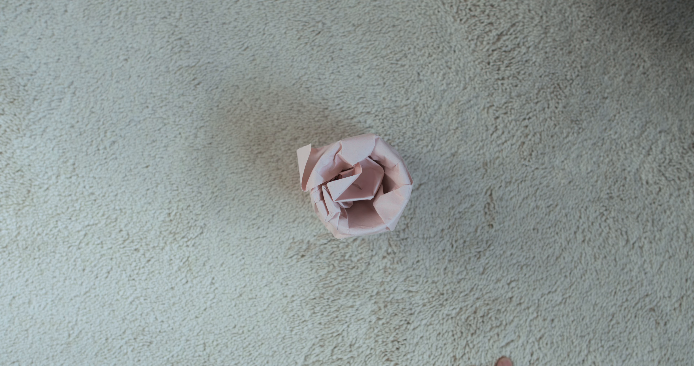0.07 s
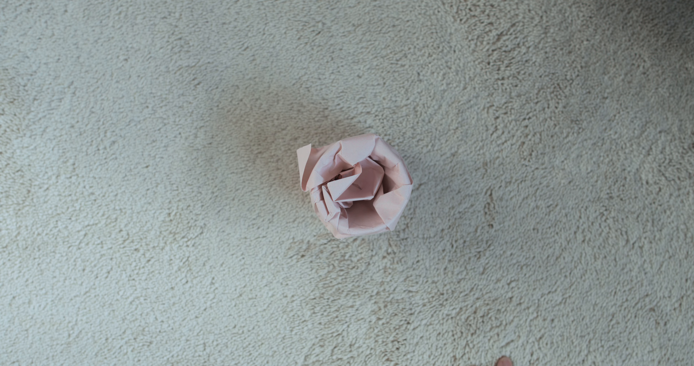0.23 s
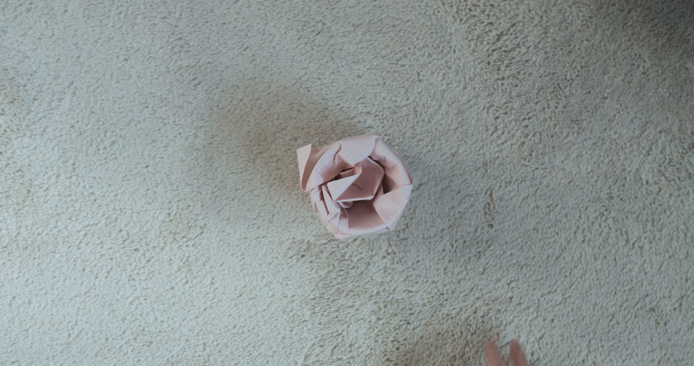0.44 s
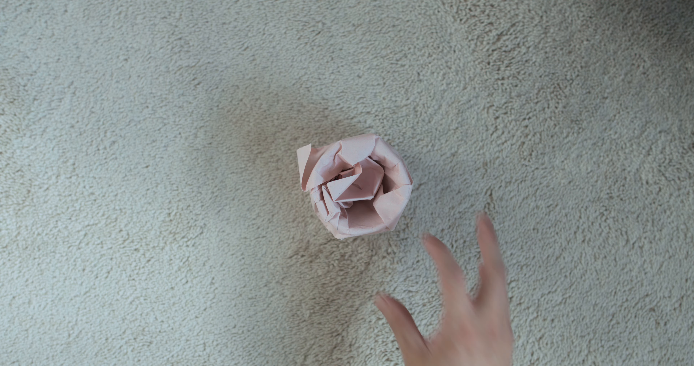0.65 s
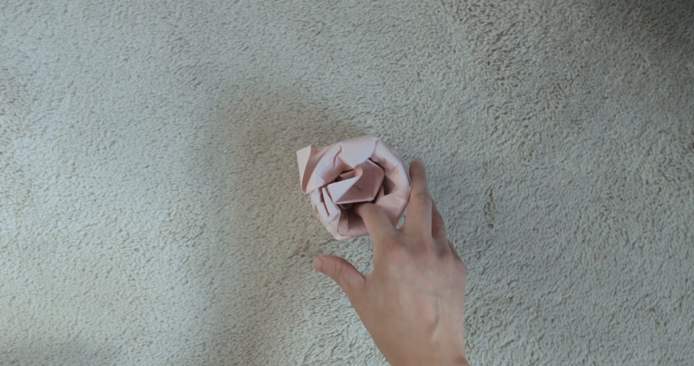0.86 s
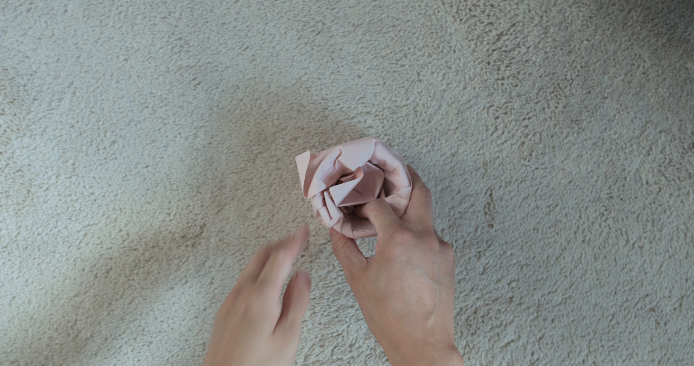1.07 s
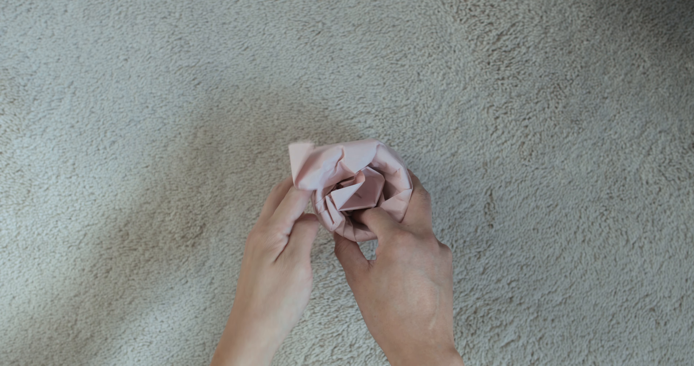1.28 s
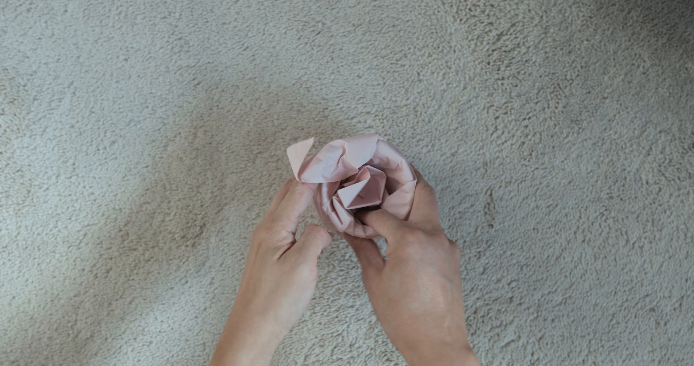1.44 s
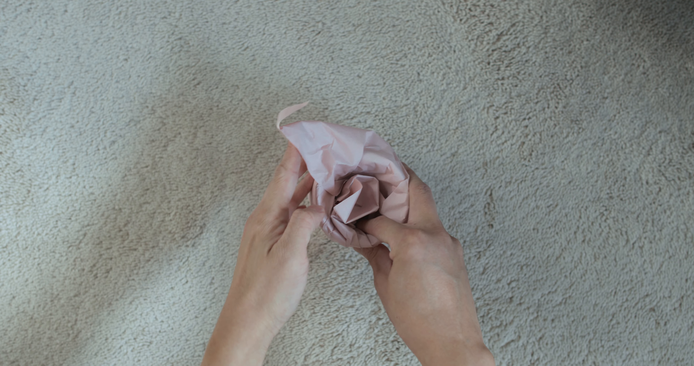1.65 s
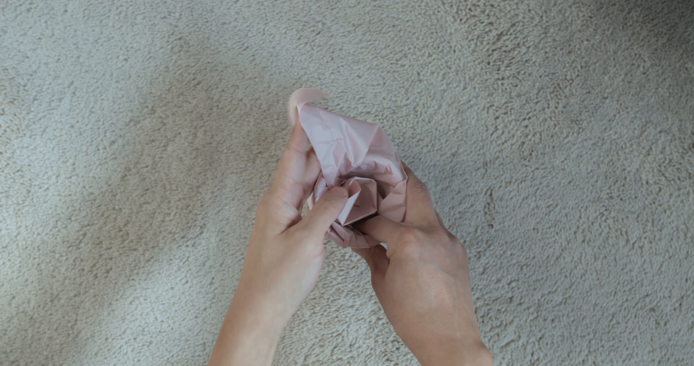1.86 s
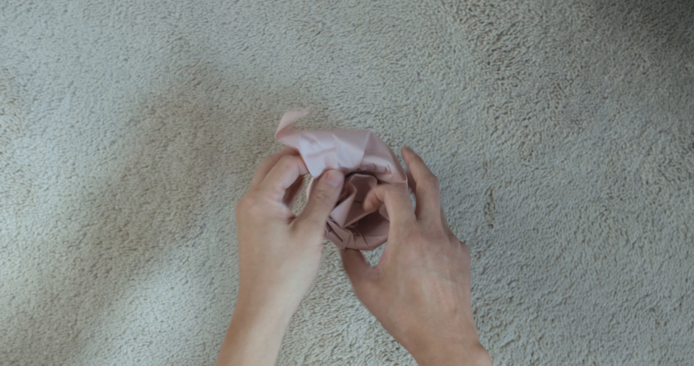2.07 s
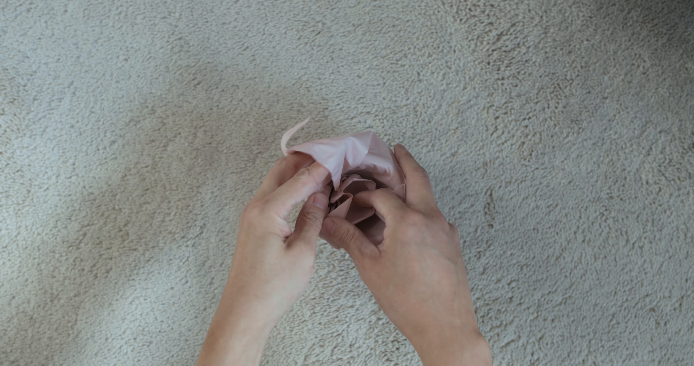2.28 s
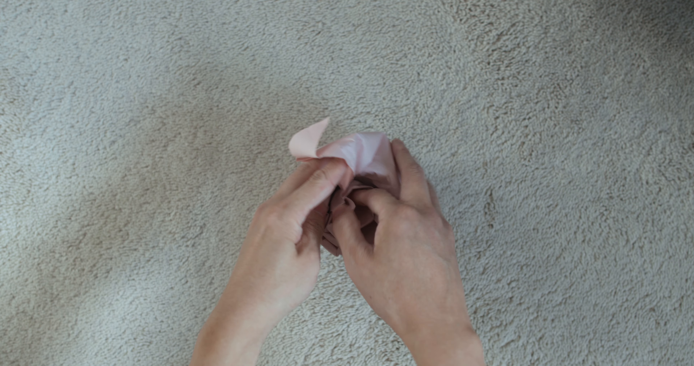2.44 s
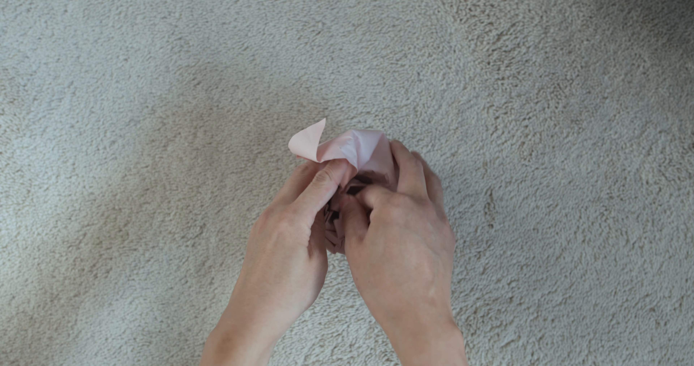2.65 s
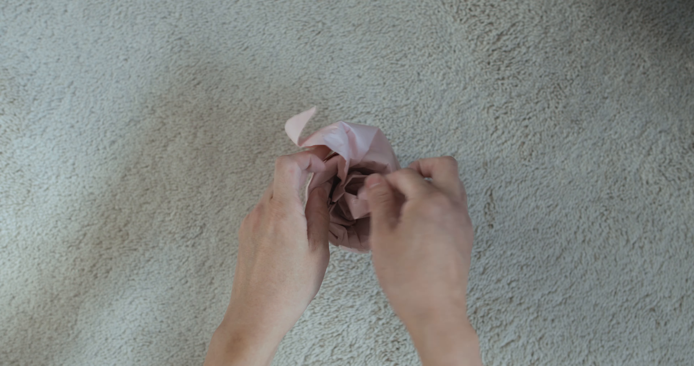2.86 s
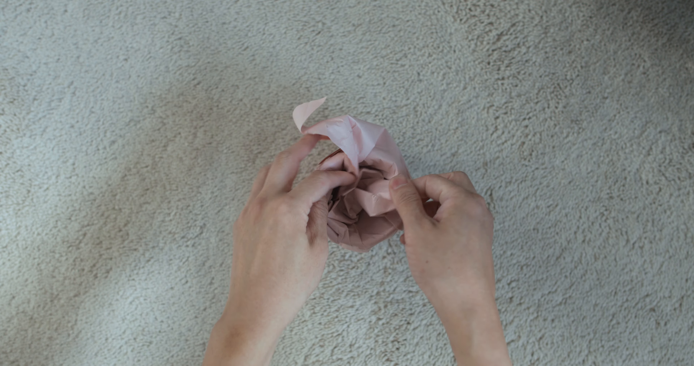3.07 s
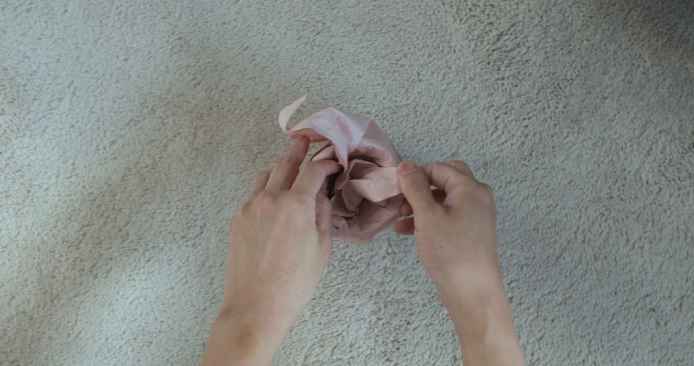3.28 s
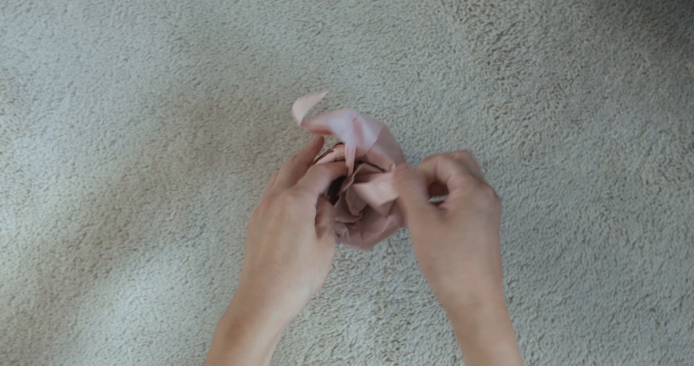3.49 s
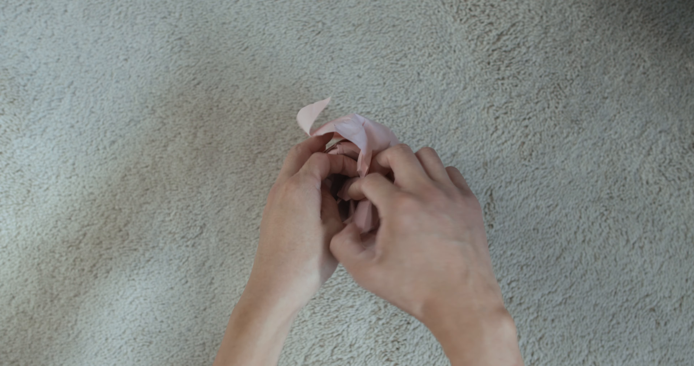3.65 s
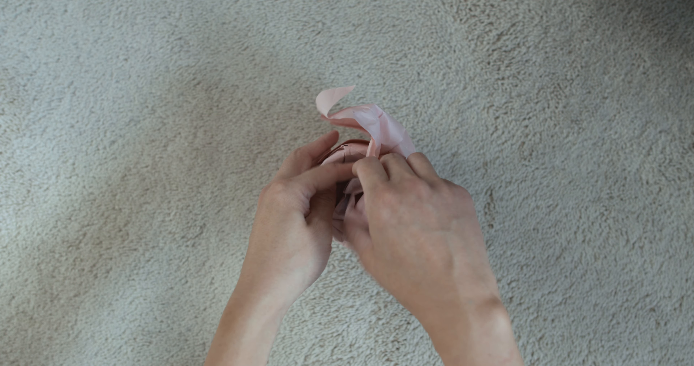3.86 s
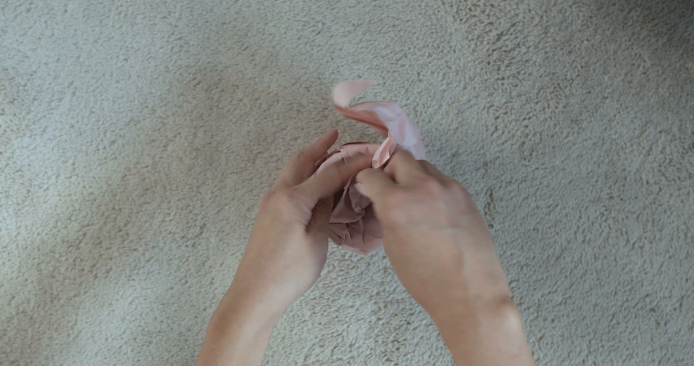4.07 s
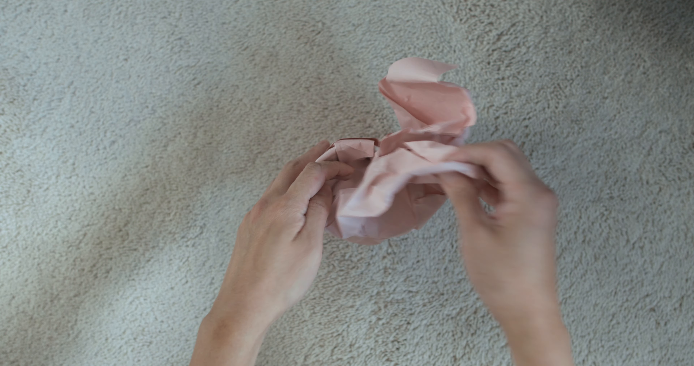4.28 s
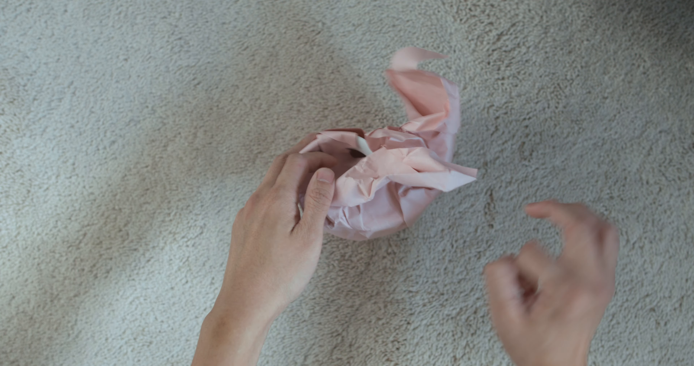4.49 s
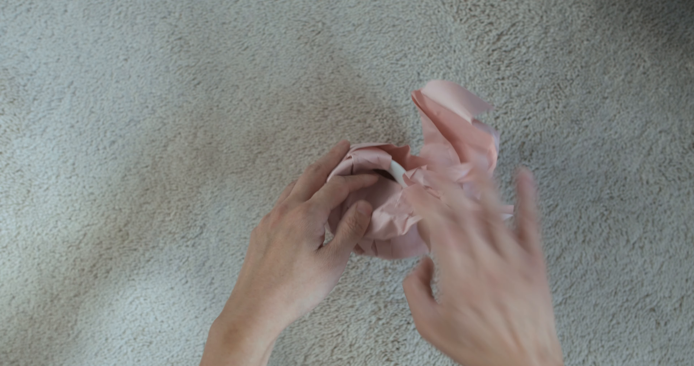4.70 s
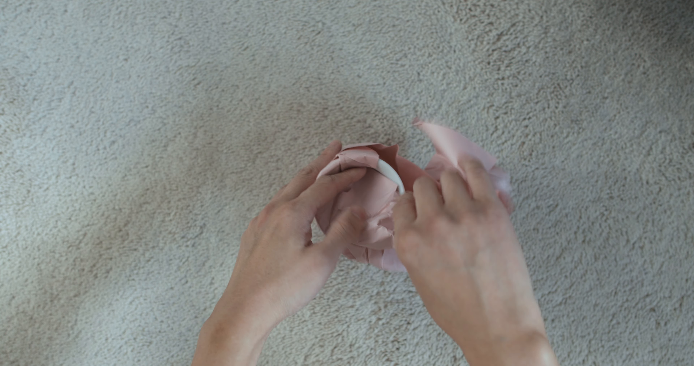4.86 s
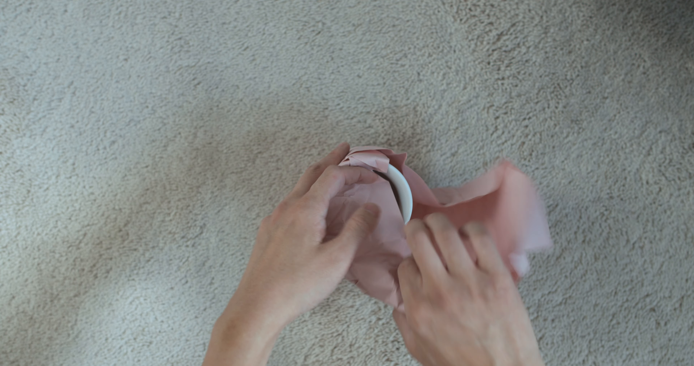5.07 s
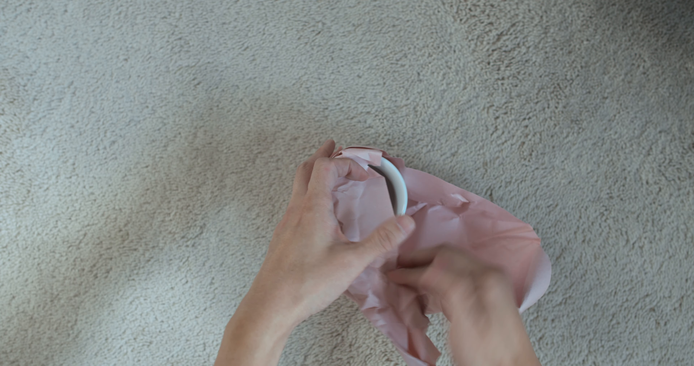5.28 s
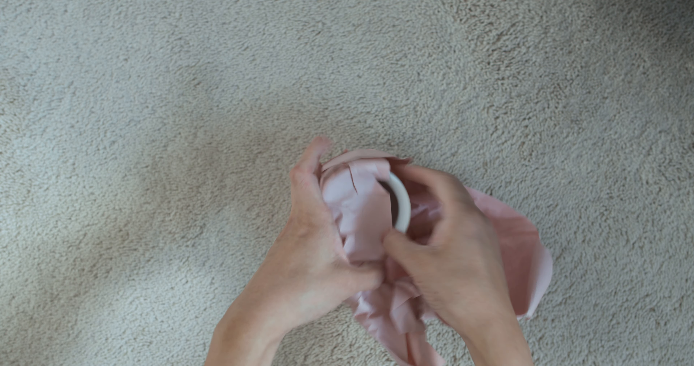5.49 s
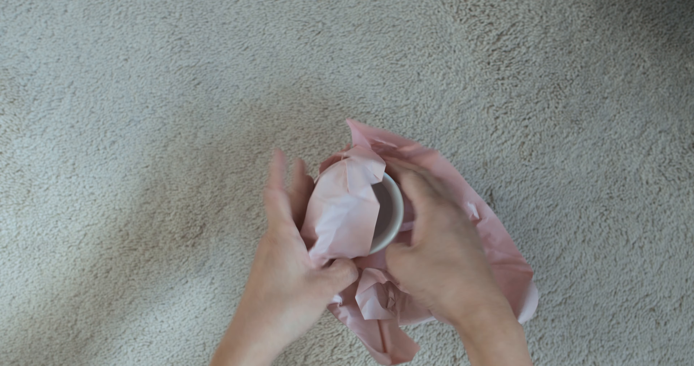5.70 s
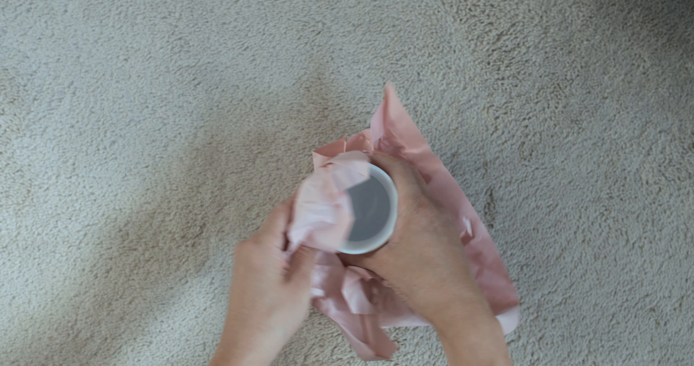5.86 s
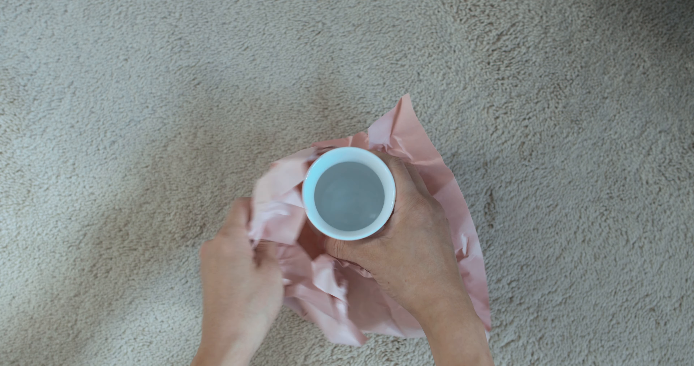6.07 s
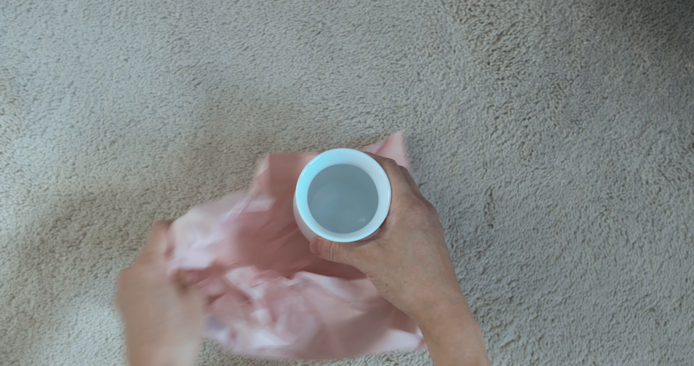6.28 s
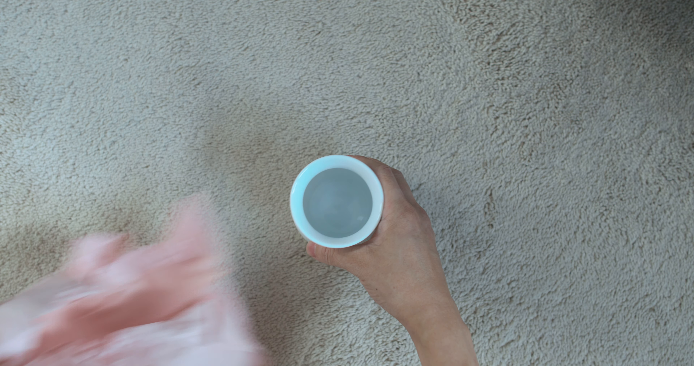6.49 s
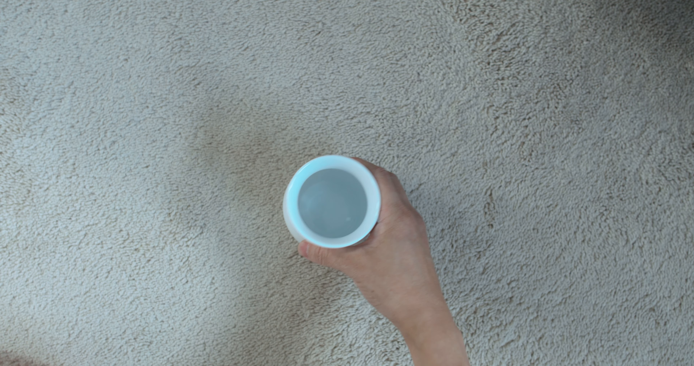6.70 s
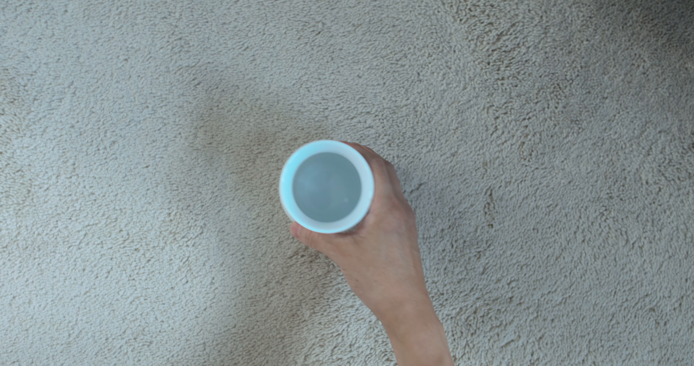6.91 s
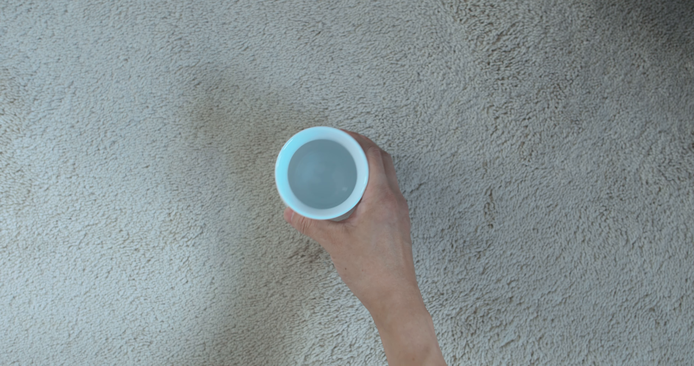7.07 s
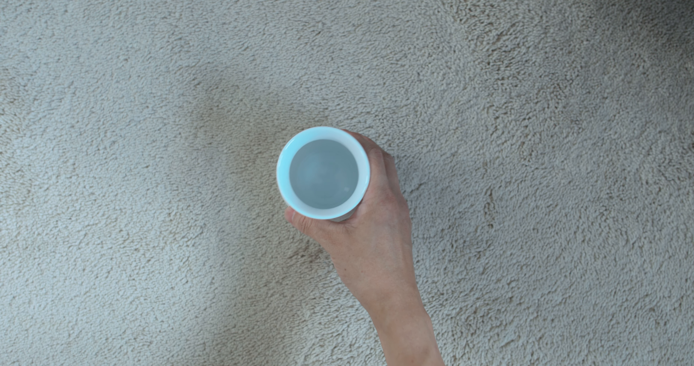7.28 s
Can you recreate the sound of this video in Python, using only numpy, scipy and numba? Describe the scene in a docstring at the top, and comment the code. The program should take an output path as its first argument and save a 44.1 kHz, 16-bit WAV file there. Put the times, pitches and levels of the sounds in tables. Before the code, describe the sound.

Hands unwrap a ceramic cup from thin paper, with crisp close crackles, sharp crease snaps and sliding rustle, fading into a quiet room.

```python
"""Hands unwrap a ceramic cup from thin tissue paper on a carpet.
A sleeve brushes over a quiet room's hum, then the paper is touched: creases buckle in short snaps
(noise bursts into damped modes) over dense crackle (small random snaps) and sliding hiss (noise bands).
The cup's air, a swept band-pass, rings along and a short echo follows; the loudest snaps clip.
At the end the sheet is pulled away and its rustle dulls and fades."""
import sys
import numpy as np
from scipy import signal
from scipy.fft import rfft, irfft
from scipy.io import wavfile
from scipy.ndimage import uniform_filter1d
from numba import njit

SR = 44100
rng = np.random.default_rng(int(sys.argv[2]) if len(sys.argv) > 2 else 0)


def store_wav(level_fs):
    """Save 16-bit WAV to argv[1]."""
    pcm = np.round(np.clip(np.atleast_2d(level_fs), -1, 1) * 32767)
    wavfile.write(sys.argv[1], SR, pcm.T.astype(np.int16))


N = 323694

# Air in the cup, deeper while paper plugs its mouth.
# Each row: time in seconds, pitch in Hz, ring level in dB re the paper.
CUP_AIR = [(.9, 540, -22), (1.9, 610, 2.5), (2.4, 600, -17), (2.6, 346, -28), (2.8, 320, 2),
           (3.0, 437, -24), (3.95, 435, -8), (4.15, 518, -1.5), (5.3, 577, -1.5), (5.75, 610, 7.5),
           (6.3, 610, -8)]


def undb(db):
    """Amplitude ratio of a level in dB."""
    return 10 ** (np.asarray(db) / 20)


def level(x, db):
    """Scale to an RMS level in dB."""
    return x * undb(db) / np.sqrt(np.mean(x ** 2))


def shape_db(table, hz):
    """Read a spectrum on a log-frequency axis."""
    table_hz, table_db = np.transpose(table)
    return np.interp(np.log(hz), np.log(table_hz), table_db)


def noise():
    """White noise for the whole scene."""
    return rng.standard_normal(N)


def walk(rate_hz):
    """Random levels held 1 / rate_hz seconds and slewed twice; spread near 1."""
    hold = int(SR / rate_hz)
    steps = np.repeat(rng.standard_normal(N // hold + 1), hold)
    slewed = uniform_filter1d(uniform_filter1d(steps, hold), hold)
    return 3.1 * slewed[:N]


@njit
def svf(x, hz, width_hz):
    """State-variable band-pass, gain 1 at the centre; hz holds one value or one for each sample."""
    y = np.empty(len(x))
    band, low, g, damping = 0., 0., 0., 0.
    for i in range(len(x)):
        if i < len(hz):
            g, damping = np.tan(np.pi * hz[i] / SR), width_hz / hz[i]
        v = (band + g * (x[i] - low)) / (1 + g * (g + damping))
        band, low = 2 * v - band, low + 2 * g * v
        y[i] = damping * v
    return y


@njit
def ring(start_s, hz, width_hz, tau_s, peak, hiss):
    """Each grain: a noise burst that swells and dies shakes a damped panel mode; scaled to its peak."""
    out, grain = np.zeros(len(hiss)), np.zeros(4096)
    for e in range(len(start_s)):
        i0, tau = int(start_s[e] * SR), tau_s[e] * SR
        n = min(4096, int(6 * tau + 2 * SR / width_hz[e]), len(out) - i0)
        g, damping = np.tan(np.pi * hz[e] / SR), width_hz[e] / hz[e]
        band1, low1, band2, low2, top = 0., 0., 0., 0., 1e-12
        for i in range(n):
            u = i / tau
            burst = hiss[i0 + i] * u * np.exp(-u * u / 2)
            # two band-pass stages in series
            v = (band1 + g * (burst - low1)) / (1 + g * (g + damping))
            band1, low1 = 2 * v - band1, low1 + 2 * g * v
            w = (band2 + g * (v - low2)) / (1 + g * (g + damping))
            band2, low2 = 2 * w - band2, low2 + 2 * g * w
            grain[i] = w
            top = max(top, abs(w))
        for i in range(n):
            out[i0 + i] += peak[e] / top * grain[i]
    return out


def snaps():
    """A buckling crease: the panel rings, a quick crack on top, a slower thump of the fold."""
    # Each row: time in seconds, level in dB, panel pitch in Hz, thump and crack in dB re the level;
    # levels are before the trims below.
    creases = [(0.903, -21.5, 1310, -3.5, -21), (0.967, -7.5, 1640, -13, -10), (1.0, -3, 1130, -15, -0.5),
               (1.005, 0.5, 1560, -23, -36), (1.133, -6.5, 2830, -20, -8), (1.145, -2, 2000, -17, -20),
               (1.243, -1, 2020, -23, -18), (1.25, -10.5, 1080, -7.5, -37), (1.26, 5, 1870, -13, -60),
               (1.308, 2, 1760, -29, -24), (1.393, -3, 2430, -32, -38), (1.408, -11, 2540, -22, -26),
               (1.421, 8.5, 5200, -30, -19), (1.622, -1, 5060, -40, -20), (1.634, 1.5, 1100, -6, 0.5),
               (1.832, 1.5, 1750, -16, -14), (1.875, -0.5, 5100, -32, 4), (1.926, -14.5, 8000, -22, 1),
               (1.989, -3, 3150, -12, 4), (2.021, -5, 2000, -14, -22), (2.061, 3.5, 2420, -19.5, -14.5),
               (2.118, -18, 1310, -29, -26), (2.145, 0, 5530, -11.5, -14), (2.151, 2.5, 1950, -35, -3),
               (2.244, 2.5, 3500, -15, -6), (2.31, -7.5, 1760, -16.5, -28), (2.435, -4, 2600, -34, -27),
               (2.444, -0.5, 1890, -21, -18), (2.452, -3.5, 2870, -23, -18), (2.492, 1.5, 1690, -15.5, -12),
               (2.627, -13, 4700, -27, 0), (2.679, -5, 5140, -30, -9), (2.762, -9, 2880, -37, -22),
               (2.787, -9.5, 1920, -17, -8), (2.894, -4, 2800, -40, -32), (2.984, -23.5, 1100, 3, -20),
               (3.033, 2.5, 1630, -20, -4), (3.051, -2, 2380, -19, -19), (3.189, -15, 2310, -25, -10),
               (3.226, 2.5, 1180, -20, -8.5), (3.3, -8, 910, -14, -3), (3.31, -15, 1890, -7, -6),
               (3.358, -17, 1650, -18, -15), (3.459, -4.5, 2120, -37, -15), (3.472, -5, 1490, -42, 1.5),
               (3.568, -0.5, 730, -13.5, -30), (3.714, -9, 2020, -33, -27), (3.729, -7, 2080, -26, -9),
               (3.921, -10.5, 6840, -32, 9), (3.946, -16, 5100, -2, -20), (3.956, -12, 5950, -6, 9),
               (3.982, -4, 1860, -26, 2), (4.039, -4.5, 3300, -37, -6), (4.053, -5, 1800, -37, -21),
               (4.079, -10.5, 1300, -20, -1), (4.11, -2.5, 2510, -18, 3), (4.135, -5, 1380, -20, -11),
               (4.141, -3.5, 1770, -17, -20), (4.166, -10.5, 1860, -33, 12), (4.187, -6.5, 2220, -18, -7),
               (4.202, -8, 3850, -26, -7), (4.212, -8, 1840, -26, -2), (4.244, -5.5, 4620, -10, 0),
               (4.257, -2, 1680, -34, -8), (4.275, 0.5, 4180, -30, -35), (4.297, -13, 1000, -10, 1),
               (4.311, -7.5, 4060, -20, -3), (4.327, -5, 2100, -13, -1), (4.362, -10, 2800, -25, -1),
               (4.385, -13, 3000, -10, 0), (4.418, 0, 4100, -11.5, -11.5), (4.443, -7, 6160, -35, -30),
               (4.458, -5, 4720, -9, -9), (4.474, -11, 4360, -25, -11), (4.495, -5.5, 3750, -13, -32),
               (4.552, -12, 2000, -13.5, -46), (4.588, -9.5, 2270, -16.5, -32),
               (4.613, -11.5, 3420, -16, -8), (4.65, -7.5, 3060, -36, -5.5), (4.873, -11.5, 880, -4.5, -25),
               (4.887, -1.5, 2150, -21, -3), (4.895, -3, 3120, -23, -11), (4.928, -8, 4000, -22, -5),
               (4.952, -0.5, 2220, -22, -13), (4.979, -6, 4380, -17, 0), (4.993, -7, 1250, -30, -22),
               (5.013, -18, 910, -1, -2), (5.023, -4, 2870, -15, -5), (5.07, -3, 3130, -14, -11),
               (5.086, -8, 6000, -11, -1), (5.098, -3, 5700, -10.5, -17), (5.106, 4, 1460, -27, -37),
               (5.134, -6.5, 1250, -13, -40), (5.22, -7, 3060, -41, -23), (5.251, -12, 930, -26, -27),
               (5.268, -7, 1670, -29, -15), (5.31, -10.5, 1070, -13, -24), (5.347, 0, 2360, -15, -5.5),
               (5.39, -9.5, 1700, -14, 1.5), (5.409, 2.5, 1850, -24, -29), (5.416, -9, 2910, -13, -18),
               (5.506, -10.5, 2900, -14, 0), (5.554, 0, 5340, -18.5, -26), (5.624, -7.5, 4900, -15.5, -9),
               (5.666, -11, 2230, -32, -14), (5.696, -8, 4980, -10.5, -5), (5.724, -13.5, 1570, -0.5, -29),
               (5.763, -10.5, 1990, -13.5, -33), (5.804, 0, 2280, -23, -2), (5.822, -5.5, 900, -7, -16),
               (5.839, 6, 2210, -23.5, -4.5), (5.898, -0.5, 2080, -17, -1), (5.955, -5, 2140, -36, -6),
               (5.978, -3, 2140, -21, -26), (6.012, -1.5, 2100, -27, -13), (6.066, -10.5, 930, -9, 8),
               (6.096, -2, 1370, -21, -43), (6.11, -8.5, 3660, -26, -1), (6.168, -7, 2760, -18, -41),
               (6.184, 4.5, 1280, -21, -15.5), (6.218, -5, 1890, -34, -32), (6.253, 0.5, 1650, -37, -26),
               (6.266, -6, 2500, -32, -18), (6.294, -3, 3470, -23, -39), (6.418, 1.5, 2350, -20, -15),
               (6.446, -2, 2450, -20.5, -45), (6.474, -14, 1500, -25, -26), (6.492, -13.5, 1470, -18, -10),
               (6.511, -15.5, 980, -25, -25), (6.552, -8.5, 1480, -20, -26), (6.563, -1, 1700, -24, -25),
               (6.569, -4, 1780, -15.5, -32), (6.598, -3, 2080, -12.5, -28), (6.649, -9, 1290, -24, -41),
               (6.692, -35, 980, 5, -12), (6.713, -28, 1110, -3, -35), (6.787, -17, 1080, -27, -28),
               (6.833, -8, 2430, -16, -69), (6.892, -21, 1200, -14, -34), (6.939, -27, 1200, -7.5, -32),
               (6.981, -28, 1070, -9, -40)]
    s, db, hz, thump_db, crack_db = np.transpose(creases)
    s = s + 0.0001  # the crease bends briefly before it gives
    one = np.ones(len(s))
    # a small, high panel gives way faster
    tau_s = 0.0012 * (0.66 + 0.91 * rng.random(len(s))) * (2000 / hz) ** 0.26
    panel = ring(s, hz, 0.6 * hz, tau_s, undb(db - 5.5), noise())
    # a sharper crease sounds brighter throughout
    body_hz = 3600 * undb(0.22 * (crack_db + 12.0))
    body = ring(s, body_hz, 1.37 * body_hz, tau_s, undb(db + 0.27 * crack_db - 2.0), noise())
    crack = ring(s, 9500 * one, 11000 * one, 0.18 * tau_s, undb(db + crack_db - 5), noise())
    # the fold thumps on the air in the cup
    cup_s, cup_hz, _ = np.transpose(CUP_AIR)
    fold_hz = 1.072 * np.interp(s, cup_s, cup_hz)
    thump = ring(s, fold_hz, 1.2 * fold_hz, 1.44 * tau_s, undb(db + thump_db + 3.5), noise())
    return panel + body + crack + thump


def handling(t, hz):
    """Paper level in dB at a time and pitch: effort of the moves, spectrum, treble tilt, bass flap."""
    # Pulls and squeezes. Each row: peak time in seconds, length in seconds, effort in dB.
    pulls = [(0.913, 0.13, -30.5), (1.102, 0.089, -33.5), (1.288, 0.074, -24.5), (1.38, 0.11, -27),
             (1.547, 0.062, -24), (1.631, 0.082, -21.5), (1.849, 0.051, -22), (1.907, 0.033, -28.5),
             (2.012, 0.16, -25), (2.13, 0.095, -22), (2.256, 0.13, -27.5), (2.408, 0.14, -29),
             (2.447, 0.018, -22), (2.567, 0.044, -35), (2.675, 0.1, -29.5), (2.828, 0.25, -26.5),
             (2.98, 0.025, -25.5), (3.04, 0.049, -27), (3.136, 0.039, -30.5), (3.226, 0.048, -27.5),
             (3.284, 0.087, -28), (3.473, 0.11, -25.5), (3.588, 0.036, -24), (3.681, 0.21, -27),
             (3.835, 0.022, -23), (3.956, 0.06, -24), (4.234, 0.27, -22.5), (4.466, 0.018, -18.5),
             (4.67, 0.082, -28), (4.782, 0.12, -35), (4.914, 0.047, -21.5), (4.964, 0.071, -24),
             (5.086, 0.069, -19), (5.238, 0.07, -24.5), (5.42, 0.28, -29.5), (5.58, 0.066, -27),
             (5.711, 0.048, -27), (5.858, 0.15, -22.5), (6.075, 0.12, -28), (6.274, 0.18, -23.5),
             (6.365, 0.049, -25), (6.405, 0.061, -25), (6.59, 0.16, -36.5), (6.716, 0.34, -41.5),
             (6.842, 0.1, -37.5), (6.906, 0.039, -40), (7.113, 0.11, -43), (7.251, 0.066, -43),
             (7.34, 0.073, -42.5)]
    # Rustle colour. Each row: time in seconds, treble tilt above the knee in dB per octave before
    # the effort's share, bass lift from the flapping sheet in dB per octave.
    colour = [(.9, 0, 9), (1.4, 1, -6), (1.8, -1, 5.5), (2.4, -0.5, 10.5), (2.8, -1, -31), (3.1, -3, 5),
              (3.5, -1.5, -47), (4.1, -0.5, -18), (4.45, -2.5, 12.5), (4.7, -1.5, 5), (5.1, -3, 15),
              (5.5, -4, 6), (5.85, 0.5, 5.5), (6.25, -5.5, 3), (6.44, 2, 9), (6.56, -15, 7), (6.72, -42, 6),
              (6.9, -13, 3), (7.0, -33, 10), (7.12, -13, 9), (7.34, -21, 9)]
    # Paper spectrum. Each row: frequency in Hz, relative density in dB per Hz.
    paper_spectrum = [(35, -49), (60, -28.5), (227, -3), (320, 2.5), (408, -2.5), (553, -4), (1470, -2.5),
                      (1950, -1), (8320, -8), (13300, -10.5), (16000, -26)]
    rise_db, fall_db = 16.5, 12.5  # lost one length before and after the peak
    roundness = 1.35  # 1 = pointed peak, 2 = rounded top with steep flanks
    rest_db = -62  # the sheet settling between moves
    touch_s, away_s = .897, 6.7  # first touch; sheet pulled away
    knee_hz, away_knee_hz = 3370, 5560  # off to the side the tilt starts higher
    bright_per_db = 0.1235  # treble tilt, dB per octave for each dB of effort
    flap_hz = 287

    grid_s = np.arange(0, N / SR, .002)
    peak_s, length_s, peak_db = np.transpose(pulls)[:, :, None]
    late = (grid_s - peak_s) / length_s
    loss_db = np.where(late < 0, rise_db, fall_db) * np.abs(late) ** roundness
    power = np.sum(undb(peak_db - loss_db) ** 2, axis=0) + undb(rest_db) ** 2
    effort_db = np.interp(t, grid_s, 10 * np.log10(power))
    untouched_db = np.where(t < touch_s, -80, 0)

    colour_s, tilts, flaps = np.transpose(colour)
    tilt = np.interp(t, colour_s, tilts) + bright_per_db * (effort_db + 30)
    knee = np.where(t < away_s, knee_hz, away_knee_hz)
    treble_db = tilt * np.maximum(np.log2(hz / knee), 0)
    bass_db = np.interp(t, colour_s, flaps) * np.clip(np.log2(flap_hz / hz), 0, 1.4)
    return effort_db + untouched_db + shape_db(paper_spectrum, hz) + treble_db + bass_db


def crackle(count, low_hz, size_db, tau_ms, db):
    """Small creases give way at random, each on its own pitch; a few are much louder."""
    u_time, u_pitch, u_size, u_tau = rng.random((count, 4)).T
    t = .9 + u_time * (N / SR - .91)
    hz = low_hz * (14000 / low_hz) ** u_pitch
    # gentle moves hiss more than they crackle
    gentle_db = 0.23 * (handling(t, 2400.0) + 27)
    # sizes in dB fall off exponentially, up to a largest crease
    crease_db = -size_db * np.log(1 - .985 * u_size)
    peak_db = handling(t, hz) + gentle_db + 10 * np.log10(hz / 1500) + crease_db + db
    tau_s = tau_ms / 1000 * (0.22 + 2.0 * u_tau)
    return ring(t, hz, 0.64 * hz, tau_s, undb(peak_db), noise())


def sliding():
    """Sheets rubbing: half-octave bands that catch and slip together and flicker alone."""
    out, t = 0, np.arange(N) / SR
    slip_db = 0.55 * walk(30) + 1.1 * walk(150)
    for hz in 50 * 2 ** np.arange(0, 8.4, .5):
        centre_hz, width_hz = np.array([hz]), hz / 1.14
        band = svf(svf(noise(), centre_hz, width_hz), centre_hz, width_hz)
        flicker_db = 1.08 * walk(60)
        out = out + undb(handling(t, hz) + slip_db + flicker_db + 3.5) * band
    return out


def cup_ring(paper):
    """The air in the cup resonates with every move of the paper over its mouth."""
    t = np.arange(N) / SR
    cup_s, pitch_hz, ring_db = np.transpose(CUP_AIR)
    air = svf(paper, np.interp(t, cup_s, pitch_hz), 110.)  # 110 Hz wide
    return undb(np.interp(t, cup_s, ring_db)) * air


def echo(paper):
    """Short reflections: a decaying noise tail of set energy, silent for its first 4 ms."""
    echo_db, t60_s = -13.5, 0.023
    t = np.arange(int(.25 * SR)) / SR
    tail = rng.standard_normal(len(t)) * 1000 ** (-t / t60_s) * (t > .004)
    tail = tail / np.sqrt(np.sum(tail ** 2))
    return undb(echo_db) * signal.fftconvolve(paper, tail)[:N]


def room():
    """Nearly steady shaped-noise hum and hiss, and a sleeve's faint brush before the hands arrive."""
    # Room spectrum. Each row: frequency in Hz, relative density in dB per Hz.
    room_spectrum = [(18, -21), (30, -12), (70, -12.5), (86, -8.5), (227, -5), (384, -11), (616, -12),
                     (900, -21), (1300, -21.5), (2200, -30), (16000, -35)]
    hum_db = -54.5
    sleeve_s, sleeve_db, rise_db_s, fall_db_s = .48, -59.5, 130, 300
    hz = np.maximum(np.fft.rfftfreq(N, 1 / SR), 1)
    shaped = irfft(rfft(noise()) * undb(shape_db(room_spectrum, hz)), N)
    hum = level(shaped, hum_db) * undb(0.23 * walk(13))
    cloth = level(svf(noise(), np.array([1500.]), 2600.0), 0)
    late_s = np.arange(N) / SR - sleeve_s
    brush_db = sleeve_db + rise_db_s * np.minimum(late_s, 0) - fall_db_s * np.maximum(late_s, 0)
    return hum + cloth * undb(brush_db)


def scene():
    """Paper with the cup's ring, its echo and the room, as one channel."""
    paper = snaps() + sliding()
    paper = paper + crackle(count=9000, low_hz=464.0, size_db=3.5, tau_ms=0.51, db=-3.0)
    paper = paper + crackle(count=450, low_hz=1020.0, size_db=3.0, tau_ms=0.74, db=3.5)
    paper = paper + cup_ring(paper)
    return (paper + echo(paper) + room())[None]


def record(dry):
    """The loudest snaps clip; then the top is cut above 15.8 kHz."""
    low_pass = signal.ellip(8, .2, 60, 15800, fs=SR, output="sos")
    return signal.sosfilt(low_pass, np.clip(dry, -1, 1))


dry = scene()
out = record(dry)
store_wav(out)
```